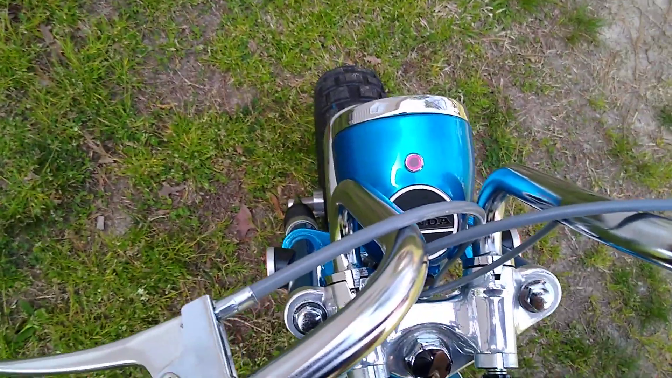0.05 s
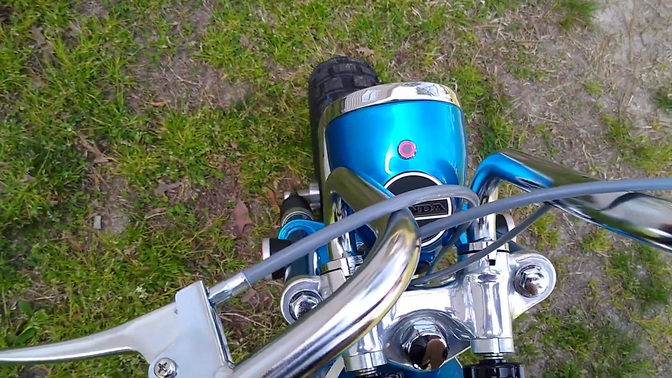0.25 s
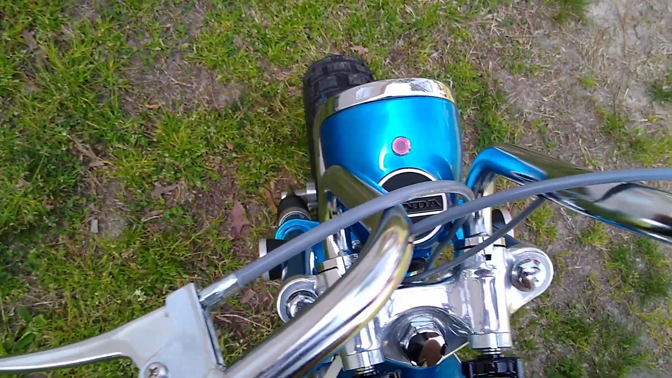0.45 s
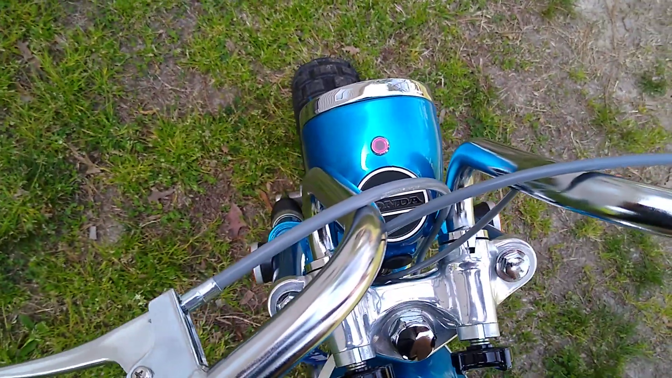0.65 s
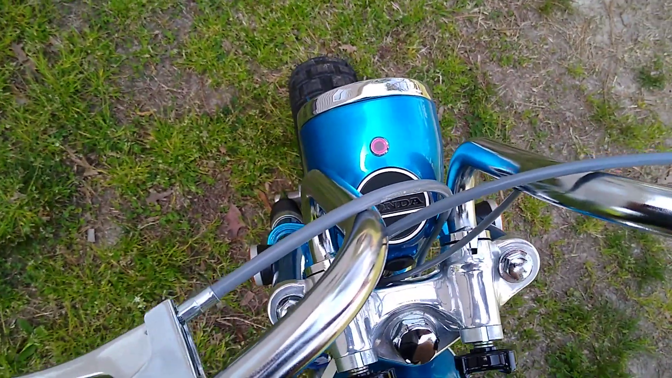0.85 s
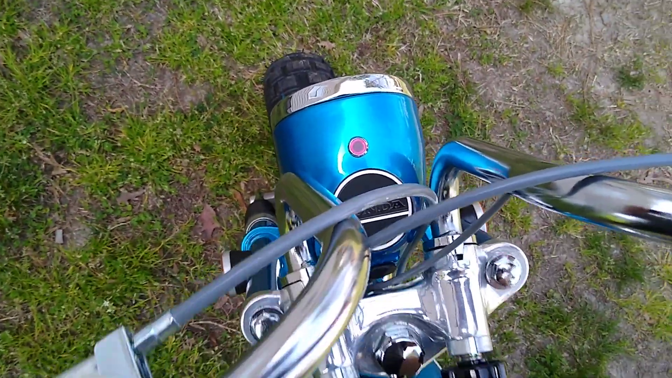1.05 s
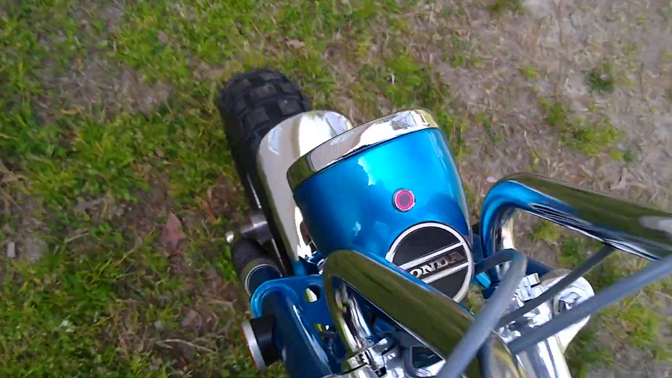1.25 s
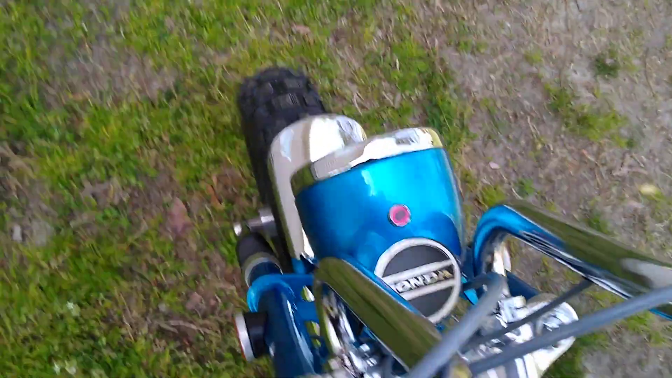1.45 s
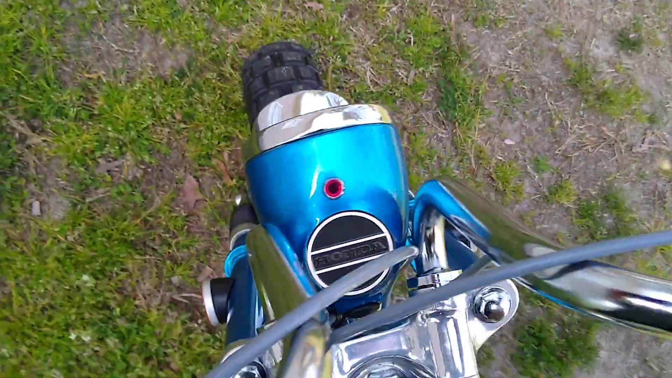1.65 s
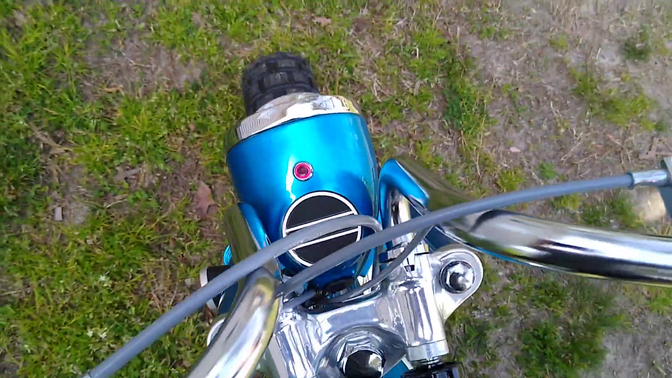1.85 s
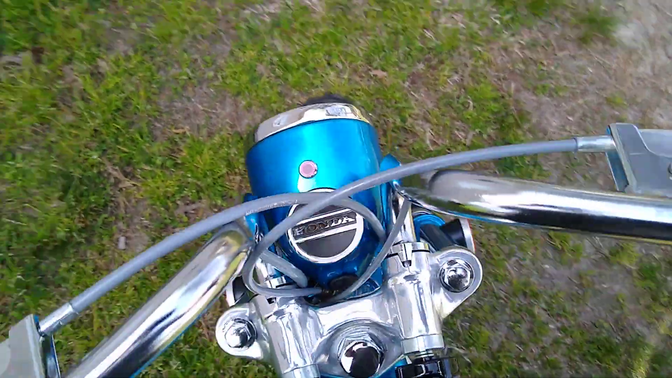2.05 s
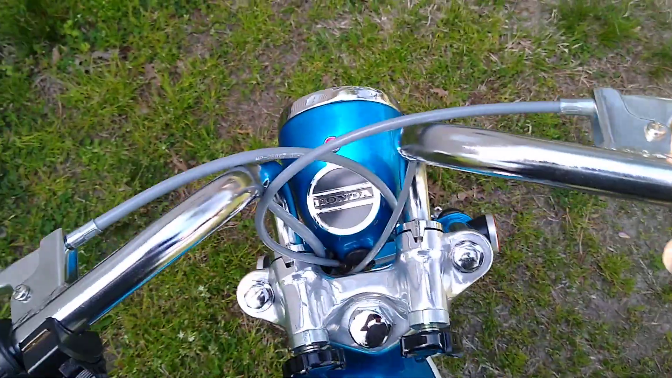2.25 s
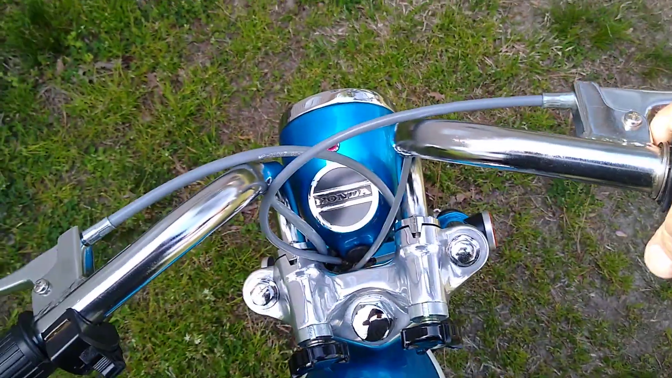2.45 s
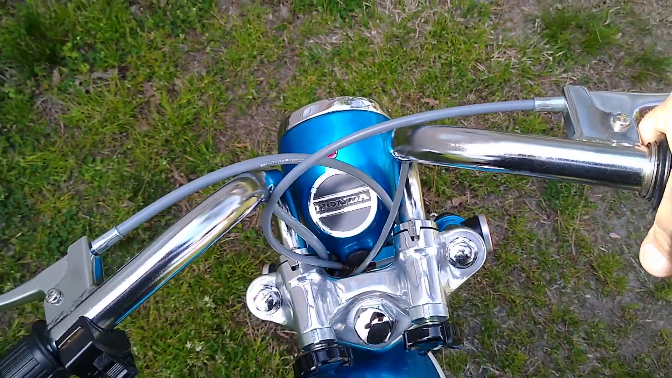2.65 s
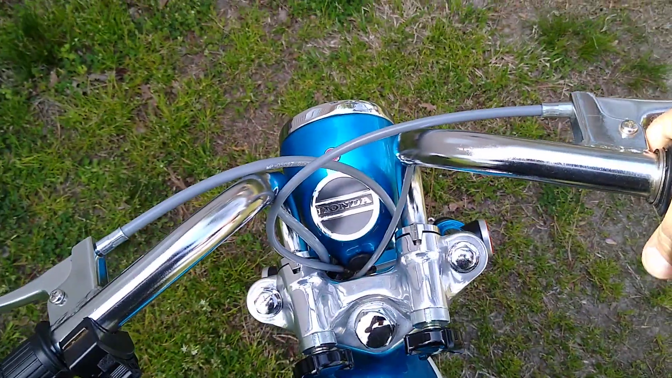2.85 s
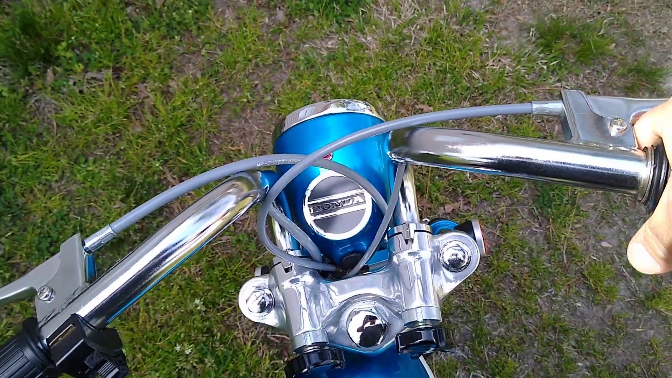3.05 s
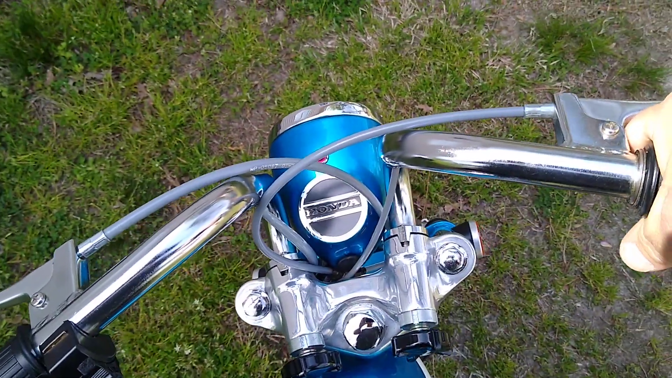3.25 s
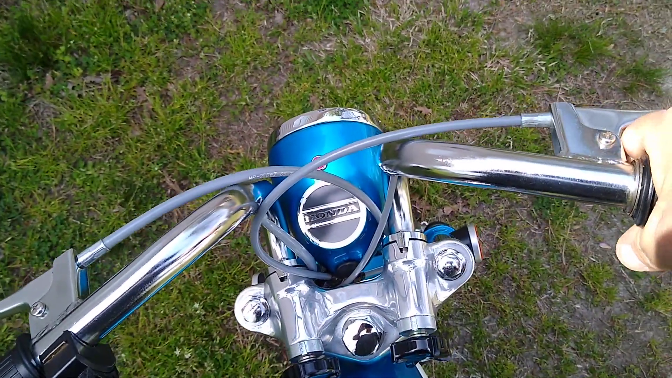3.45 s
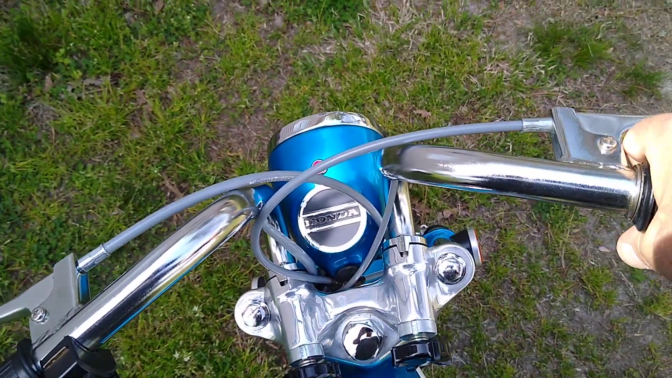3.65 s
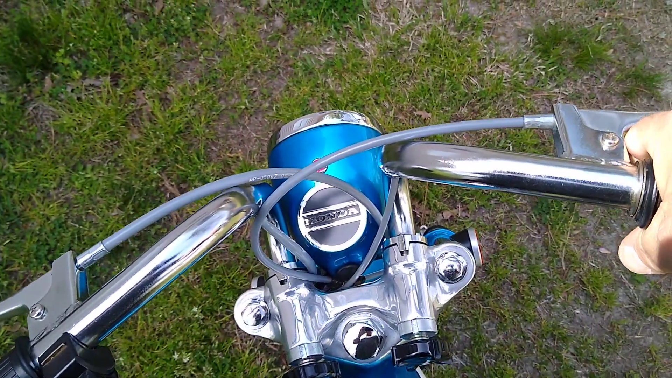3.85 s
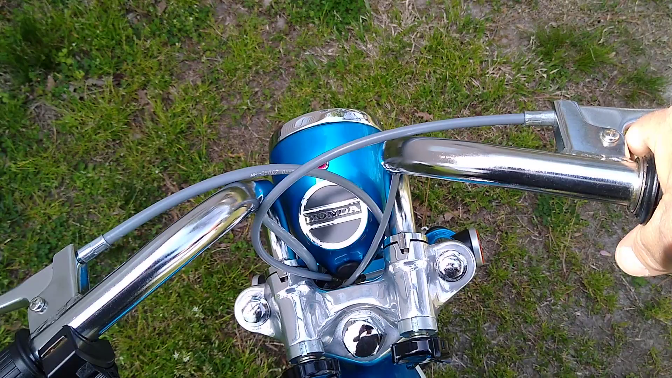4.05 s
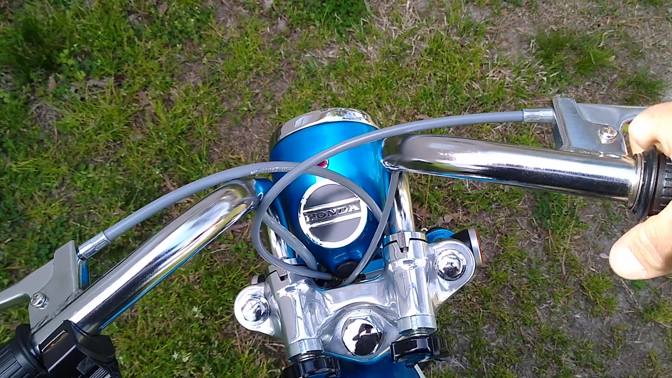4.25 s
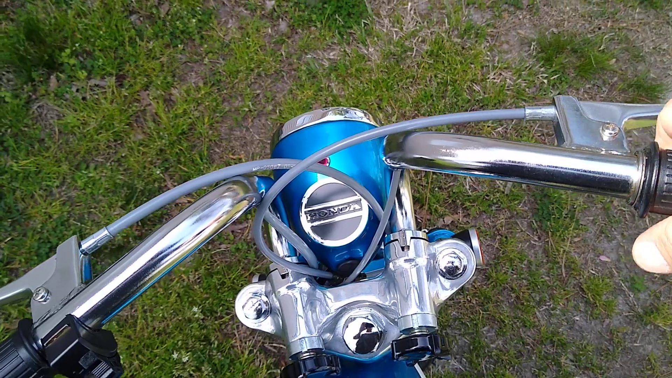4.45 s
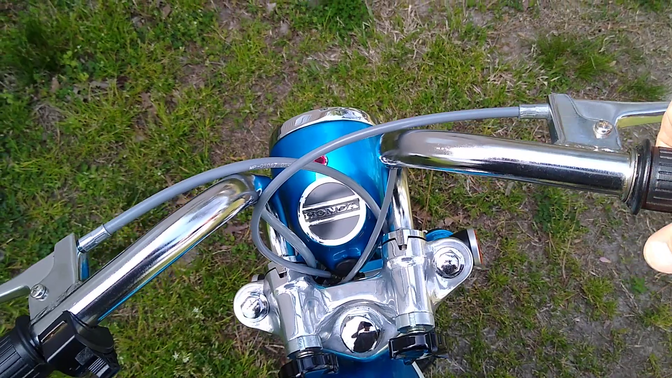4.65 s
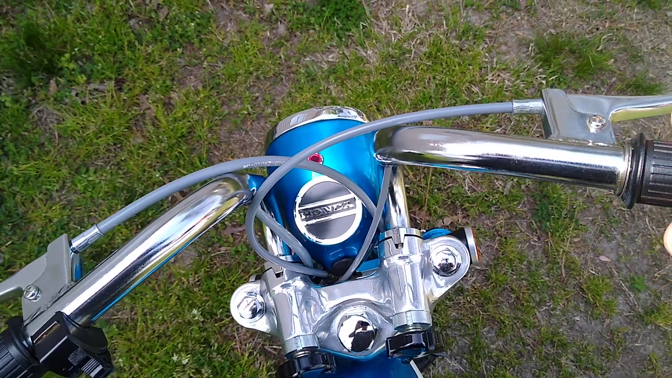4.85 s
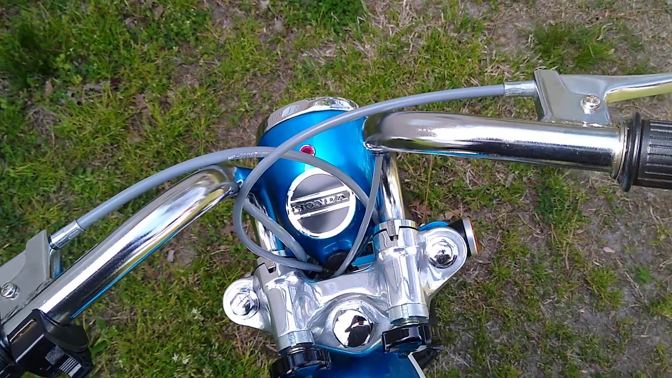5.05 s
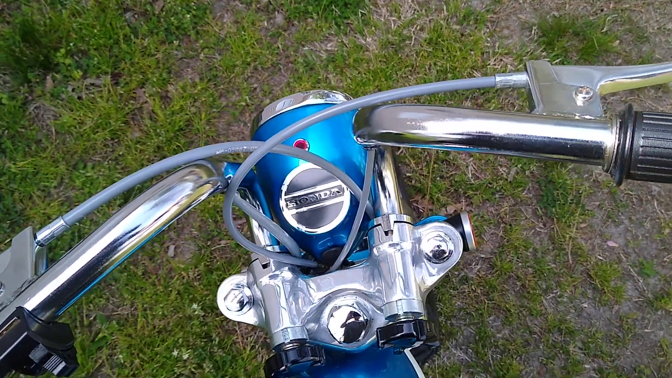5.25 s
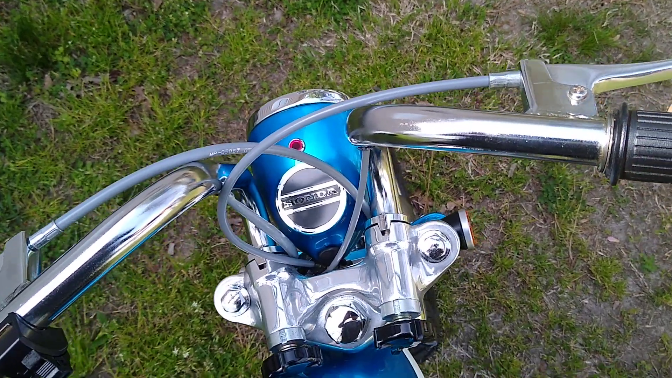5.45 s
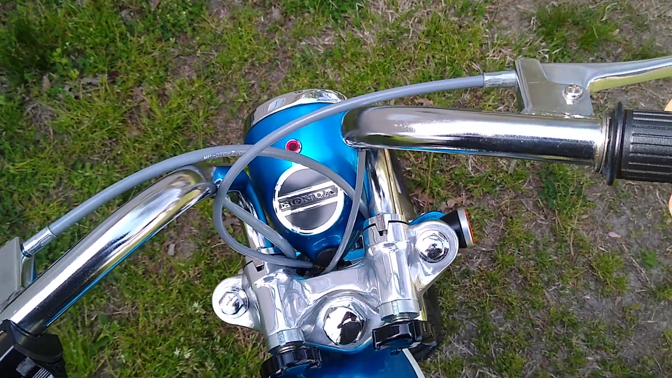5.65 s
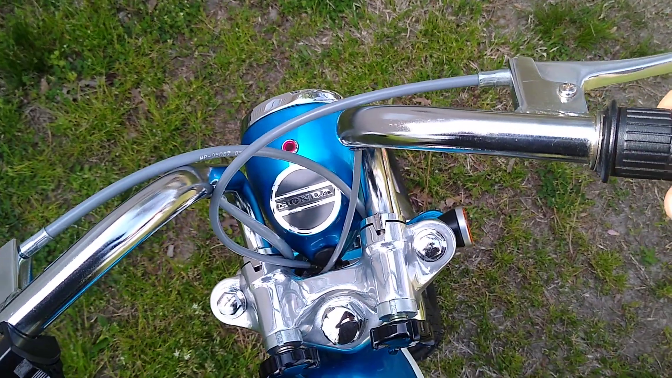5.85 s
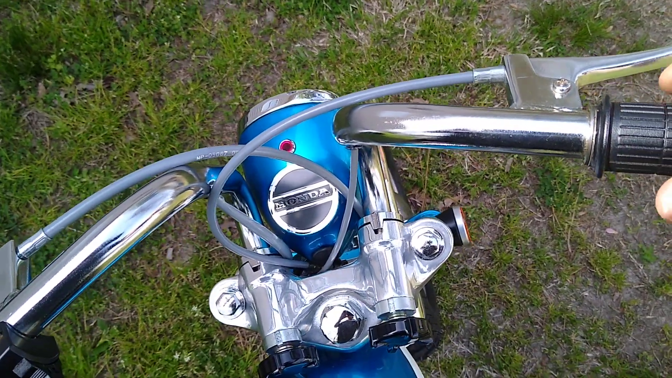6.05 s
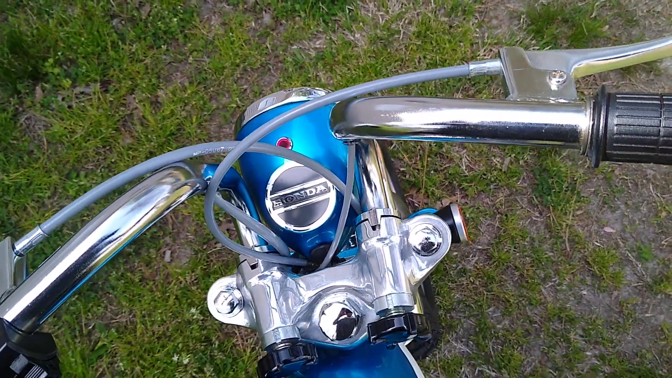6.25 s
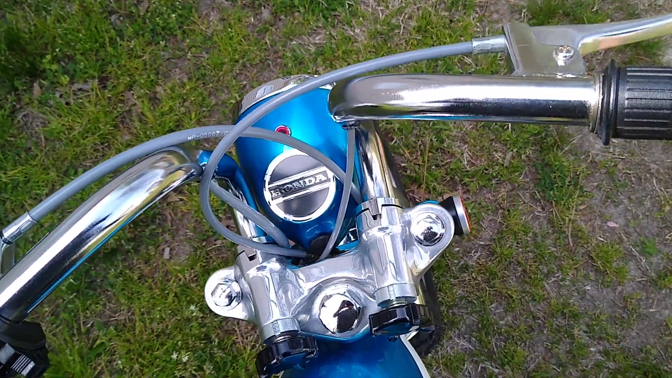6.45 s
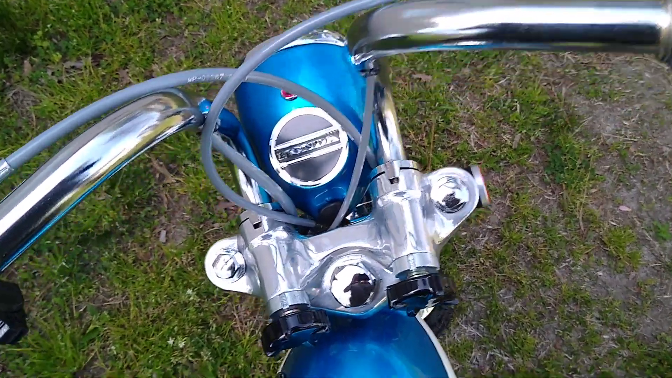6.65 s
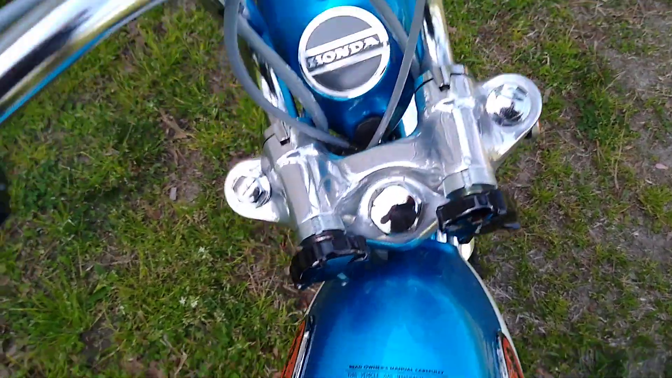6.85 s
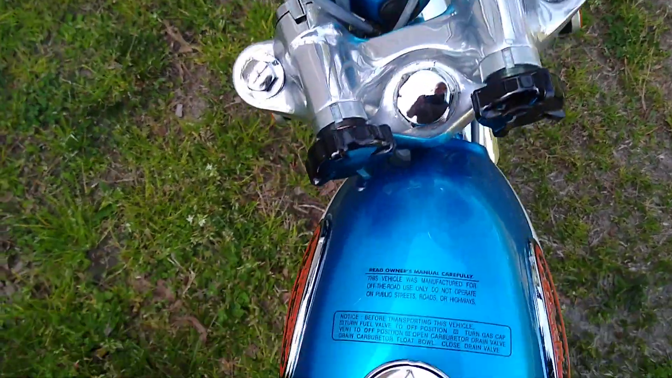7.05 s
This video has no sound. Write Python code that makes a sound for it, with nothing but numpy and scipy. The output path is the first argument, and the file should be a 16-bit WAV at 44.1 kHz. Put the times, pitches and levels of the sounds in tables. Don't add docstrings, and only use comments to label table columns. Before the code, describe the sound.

After a quiet second of breeze, faint birds and small clicks, a kick lever rattles a little four-stroke engine into life; it stumbles, sags and recovers to fast idling.

```python
import sys
import numpy as np
from scipy import signal
from scipy.fft import rfft, irfft, next_fast_len
from scipy.io import wavfile
from scipy.ndimage import uniform_filter1d

SR = 44100
rng = np.random.default_rng(int(sys.argv[2]) if len(sys.argv) > 2 else 0)


def pcm_store(signal):
    levels = np.round(np.clip(np.atleast_2d(signal), -1, 1) * 32767)
    wavfile.write(sys.argv[1], SR, levels.astype(np.int16).T)


def boost(x):
    u = np.asarray(x, float) / 20
    return 10 ** u


N = 313110

# t/s, blast lost level/dB, thump lost level/dB
MISFIRES = [(1.245, 18.5, 21), (1.328, 28, 10), (1.803, 34, 13), (1.922, 19, 6), (2.048, 27, 3),
            (2.658, 2.5, -0.5), (2.708, 30, 3), (2.808, 15, 6), (2.859, 18, 2.5), (2.968, 31, 7),
            (3.032, 14, 8), (3.102, 42, 7.5), (3.173, 13, 8), (3.333, 13, 6), (3.426, 2.5, 1.5),
            (3.525, 29, 4), (6.503, 32, 14)]
# t/s, cycle rate f/Hz
CRANK_SPEED = [(1.245, 11.907), (1.46, 12.186), (1.54, 14.418), (1.74, 17.716), (2.1, 14.849),
               (2.38, 21.695), (2.58, 22.713), (2.9, 17.487), (3.34, 11.518), (3.46, 8.589), (3.98, 13.319),
               (4.26, 15.089), (4.78, 21.587), (4.94, 24.15), (5.14, 24.644), (5.66, 24.906),
               (5.94, 23.783), (7.1, 22.664)]
# t/s, flow level/dB
AIR_FLOW = [(1.26, -32), (1.36, 4), (1.8, 7.5), (1.88, 4), (2.05, -7.5), (2.2, 8), (2.42, 4.5), (2.6, -6.5),
            (2.85, -20), (3.0, -20), (3.35, -24), (3.6, -7.5), (3.75, 2), (4.2, 2), (5.3, 0), (5.75, -3),
            (6.5, -2), (7.1, 0.5)]
# t/s, facing 0-1
FACING = [(1.4, 0.98), (2, 1), (2.3, 0.77), (3, 0), (3.9, 1), (4.6, 0.52), (7.1, 0)]

# f/Hz, width f/Hz, level/dB, polarity (signed strength)
CAN_MODES = [(62.6, 89, -5, -1.16), (118.5, 25.7, 3, 0.98), (164, 35.6, 0, -0.52), (192.9, 8.7, 6, 0.7)]
# f/Hz, width f/Hz, level/dB, polarity
PIPE_MODES = [(342, 40, -0.6, 1), (434, 34, -1.3, 1), (493, 71, -7.0, -1), (719, 51, -7.6, 1),
              (810, 175, -4.7, -1), (937, 131, -9.0, 1), (1058, 65, -24.8, -1), (1367, 69, -5.0, -1),
              (1426, 236, -4.7, 1), (1596, 735, -13.6, -1), (1861, 95, -8.8, 1), (2084, 104, -22.4, -1),
              (2762, 136, -17.2, 1)]
# f/Hz, width f/Hz, level/dB, polarity
SNORKEL_MODES = [(113, 66, -3, -0.97), (181.15, 9.3, 6, 0.71)]
# f/Hz, width f/Hz, level/dB, polarity
SHIELD_MODES = [(3392, 56, -1.5, 0.79), (4010, 38, -3.5, -0.8), (4300, 120, -3.5, 0.77),
                (5320, 54, -4.5, -0.94)]
# f/Hz, width f/Hz, level/dB, polarity
CASE_MODES = [(189, 72, 3.5, 1), (374, 105, 0, -1.6), (466, 72, 4, 1), (840, 215, -6.5, -1.23),
              (1394, 140, 2, 0.57), (1890, 203, -1, -0.73), (2980, 810, -15, 0.29), (4160, 144, -11, -0.6)]
# f/Hz, width f/Hz, level/dB, polarity
JET_MODES = [(10200, 600, 0, 1), (12900, 700, 0, -1)]

# f/Hz, level/dB (per Hz)
EXHAUST_HISS = [(2000, -5), (3000, -4), (4100, -5.5), (4800, -4.5), (6500, -8.5), (7700, -9.5), (10000, -4),
                (12800, -3.5), (15600, -4.5), (15950, -55)]
# f/Hz, level/dB
BAFFLE_RASP = [(500, -63), (900, -9), (1150, -6), (1450, 15), (1750, -33), (2050, 10), (2400, -4.5),
               (2700, 10.5), (3100, -24), (5000, -59)]
# f/Hz, level/dB
INTAKE_HISS = [(2000, -47), (4000, -2.5), (6500, -6), (9000, -8), (10500, 0.5), (12800, 10.5), (15600, 2),
               (15950, -42)]
# f/Hz, level/dB
BUFFET = [(25, -20), (50, 3.5), (90, 5), (150, 1), (300, -16.5), (600, -44.5)]
# f/Hz, level/dB
AIR_RUSTLE = [(100, 6), (300, 10), (700, 4), (1500, 2), (2300, -6), (3200, -19), (4500, -17), (5500, -40),
              (8000, -48)]
# f/Hz, level/dB
RESTING_HISS = [(3000, -2), (6000, -11), (9000, -24), (11000, 0), (13500, 2), (15700, -4), (15950, -40)]

# f/Hz, left-right level/dB
LEFT_LEAN = [(60, 2.5), (110, 3.0), (200, 2.5), (380, 2.5), (700, 4.0), (1290, 10.0), (2380, 9.5),
             (4400, 3.0), (8120, 2.5), (15000, 4.5)]
# f/Hz, likeness 0-1
PORT_LIKENESS = [(100, 0.82), (500, 0.86), (1200, 0.06), (3000, 0.052), (10000, 0.029)]
# t/s, buffet level/dB
GUSTS = [(0, -57), (.06, -60), (.17, -46.5), (.25, -55.5), (.34, -50), (.5, -56.5), (.79, -58),
         (.85, -56.5), (1.1, -57.5)]
# t/s, half length t/s, level/dB
INSECTS = [(.04, .09, -76), (0.37, .035, -71), (.83, 0.083, -77), (1.02, .08, -84)]
# t/s, level/dB, f/Hz, width f/Hz, t60 t/s
TICKS = [
    (.549, -47, 9100, 9000, 0.012),
    (.595, -62, 11000, 7000, .02),
    (.687, -59, 1870, 505, 0.067),
    (.724, -60, 4500, 4000, .03),
    (0.739, -47.5, 1800, 900, 0.036),
    (.919, -54, 1790, 700, 0.062),
    (1.176, -57, 920, 1800, 0.09),
    (1.202, -52.5, 1800, 3500, 0.095),
]
# t/s, level/dB, f/Hz, width f/Hz
RUSTLES = [(.1, -66, 4500, 1000), (0.29, -67, 4500, 1000), (0.26, -59.5, 2400, 400), (0.69, -62, 2830, 500),
           (0.51, -67, 3700, 450)]
# start t/s, length t/s, first f/Hz, last f/Hz, level/dB
BIRDS = [(0, 0.039, 4300, 3900, -75), (0.027, 0.073, 3800, 3600, -70), (.09, .05, 3800, 3650, -77),
         (0.142, 0.064, 3450, 2760, -64), (.16, 0.06, 2250, 2120, -68), (0.248, 0.072, 3170, 2390, -71),
         (0.511, 0.14, 3620, 3600, -75), (0.653, .06, 3870, 3700, -80)]

# level at full idle/dB, dB per dB of speed, dB per dB of flow (exhaust: scatter of strokes/dB)
BLAST, THUMP, SPIT = (-5, 1.17, 0.1, 0.28), (-22.5, 0.42, -0.02, 0.48), (-19.5, 0.02, 0.57, 1.5)
ROAR, HISS, GEAR = (-53.5, -1.3, 0.6), (-33.5, 0.12, 0.71), (-29.5, 1, 0.14)
WHISTLE = (-46, 6.9, 0.87)
IDLE_HZ = 24.4
UNEVEN = 1.37
LEVER_S, BITE_S = 1.17, 1.225
CATCH_S, LET_GO_S = 1.4, 1.8
TOP_HZ = 15950


def cycles():
    t = np.arange(CRANK_SPEED[0][0], N / SR + .1, 1e-4)
    turns = np.cumsum(curves(CRANK_SPEED, t)[0]) * 1e-4
    s = np.interp(np.arange(int(turns[-1])), turns, t)
    levels = [law(k, s) + k[3] * rng.standard_normal(len(s)) for k in (BLAST, THUMP, SPIT)]
    rows = np.c_[s, np.transpose(levels)]
    for at, blast_db, thump_db in MISFIRES:
        spit_db = min(33, 1.6 * blast_db)
        rows[np.argmin(abs(s - at)), 1:] -= [blast_db, thump_db, spit_db]
    return rows


def exhaust(rows):
    s, blast_db, thump_db, spit_db = rows.T
    gap = np.gradient(s)
    speed = (1 / IDLE_HZ / gap)[:, None]
    tone = pipe_blast(s, blast_db, speed) + can_thump(s, thump_db, gap, speed)
    return tone + heat_shield(s, blast_db, speed) + hot_gas(s, blast_db, spit_db)


def pipe_blast(s, blast_db, speed):
    pipe = modes(PIPE_MODES, scatter(PIPE_MODES, np.linspace(.3, 1.6, len(PIPE_MODES)), speed))
    facing = curves(FACING, s).T
    top_db = -5 + 5.5 * facing ** 2
    bounce_db = -2 + 10 * facing

    def heat(f):
        return speed ** (0.22 / (1 + (f / 800) ** 4))

    def outlet(f):
        tilt_db = top_db * f * f / (f * f + 700 ** 2)
        return boost(tilt_db + bounce_db * bell(f, 1034, 116) - 4.2 * bell(f, 575, 89))

    def baffle(f):
        return (1 + .6 * np.exp(-2j * np.pi * f * .0019)) / (1 + 1j * f / 5400)

    return rings(s - .0001, blast_db + 37, lambda f: pipe(f / heat(f)) * baffle(f) * outlet(f))


def can_thump(s, thump_db, gap, speed):
    can = modes(CAN_MODES, scatter(CAN_MODES, .3, speed))
    snorkel = modes(SNORKEL_MODES, scatter(SNORKEL_MODES, .4, speed))

    def stroke(f):
        return (1j * f / (1j * f + 75 * speed ** 1.45)) ** 2

    def muffled(f):
        return boost(-6 * bell(f, 307, 54)) / (1 + 1j * f / 500) ** 2

    thump = rings(s - .003, thump_db + 57,
                  lambda f: can(f / speed ** 0.051) * stroke(f) * muffled(f), top_hz=3000)
    gulp = rings(s + 0.399 * gap, thump_db + 50.5,
                 lambda f: snorkel(f / speed ** 0.036) * stroke(f), top_hz=4000)
    return thump + gulp


def heat_shield(s, blast_db, speed):
    shield = modes(SHIELD_MODES, scatter(SHIELD_MODES, 2.5, speed))
    return rings(s + 0.001002, blast_db + 13, shield, top_hz=9000)


def hot_gas(s, blast_db, spit_db):
    rasp = signal.fftconvolve(pulses(s, blast_db - 22), puff(0.12))[:N]
    spit = signal.fftconvolve(pulses(s, spit_db + 2.5), puff(0.019) + 0.15 * puff(0.22))[:N]
    fizz_db = spit_db - 3 + 6 * rng.standard_normal(len(s))
    fizz = signal.fftconvolve(pulses(s + .0005, fizz_db), puff(0.024))[:N]
    noise = shaped(fizz * pair(), colour(INTAKE_HISS))
    noise = noise + shaped(rasp * pair(), colour(BAFFLE_RASP))
    return noise + shaped(spit * pair(), colour(EXHAUST_HISS))


def puff(t60):
    t = np.arange(SR // 8) / SR
    return boost(-60 * t / t60) * (1 - np.exp(-t / 0.0016))


def intake(rows):
    t, s = np.arange(N) / SR, rows[:, 0]
    turn = np.interp(t, s, np.arange(len(s)))
    phase = turn % 1
    moving = t > LEVER_S
    roar_db, hiss_db, gear_db = breath(t)
    vary = boost(2 * rng.standard_normal(len(s)))[turn.astype(int)]
    gasp = vary * np.exp(-((phase - .47) / 0.13) ** 4)
    clack, tick = valves(s)
    chatter = gears(t, phase, gear_db)

    rattle = (boost(roar_db) * gasp + chatter) * moving * patchy(pair())
    case = modes(CASE_MODES)
    body = shaped(rattle + clack, lambda f: case(f) * 1j * f / (1j * f + 350) * (f < TOP_HZ))
    rush = shaped((boost(hiss_db) * gasp + tick) * moving * pair(), colour(INTAKE_HISS))
    whirr_off = boost(-2 * 0.5 * (t < CATCH_S))
    gear_hiss = boost(-11.5) * chatter * vary * whirr_off * moving
    return jet_whistle(t, gasp) + body + rush + shaped(gear_hiss * pair(), colour(EXHAUST_HISS))


def valves(s):
    gap = np.diff(s)
    loose = (gap * IDLE_HZ) ** UNEVEN
    draw = lambda: rng.standard_normal(len(gap))
    shut = s[:-1] + (0.54 + 0.00572 * loose * draw()) * gap
    opens = s[:-1] + (0.29 + 0.0066 * loose * draw()) * gap
    harder_db = 6.5 * (shut > CATCH_S) * (shut < LET_GO_S)
    clack = pulses(shut, breath(shut)[0] + 26 + harder_db + 3 * draw())
    clack = clack + pulses(opens, breath(opens)[2] + 22 + 4 * draw())
    tick = pulses(opens, breath(opens)[2] - 8 + 3 * draw())
    decay = boost(-60 * np.arange(2000) / SR / 0.0084)
    return clack, signal.fftconvolve(tick, decay)[:N]


def gears(t, phase, gear_db):
    level_db = gear_db + 0.5 * (t < CATCH_S) - 5 * phase * (t > CATCH_S)
    grains = boost(3 * rng.standard_normal(N // 80 + 1)).repeat(80)[:N]
    return boost(level_db) * grains


def jet_whistle(t, gasp):
    air = boost(law(WHISTLE, t)) * (0.27 + gasp) * (t > BITE_S)
    hole = modes(JET_MODES)
    return shaped(air * pair(), lambda f: hole(f) ** 2)


def breath(t):
    slack_db = 16.5 * np.exp(-np.maximum(t - BITE_S, 0) / .012)
    rattle_db = 5.5 * (1 - np.tanh((t - LET_GO_S) / .02)) / 2 * (t > CATCH_S)
    return np.array([law(ROAR, t) + rattle_db, law(HISS, t), law(GEAR, t)]) - slack_db


def outdoors():
    return wind() + handling() + birds()


def wind():
    t = np.arange(N) / SR
    gust_db, = curves(GUSTS, t)
    air = boost(gust_db + [[-2], [2]]) * shaped(pair(), colour(BUFFET))
    rustle_db = -63.5 + 0.59 * (gust_db + 55.5)
    air = air + boost(rustle_db) * shaped(pair(), colour(AIR_RUSTLE))
    swell = boost(-79.5) + sum(boost(db) * np.exp(-((t - s) / half) ** 2) for s, half, db in INSECTS)
    return air + swell * shaped(pair(), colour(RESTING_HISS))


def handling():
    out, u, noise = np.zeros((2, N)), np.arange(SR // 2) / SR, pair()
    events = [(*k, .001) for k in TICKS] + [(*k, 0.77, .04) for k in RUSTLES]
    for s, db, hz, width, t60, rise in events:
        at = slice(round(s * SR), round(s * SR) + len(u))
        band = signal.iirpeak(hz, hz / width, SR)
        envelope = boost(db - 60 * u / t60) * (1 - np.exp(-u / rise))
        burst = envelope * np.roll(noise, round(hz), axis=1)[:, at]
        burst = signal.lfilter(*band, signal.lfilter(*band, burst))
        out[:, at] += burst * np.sqrt(SR / 2 / width)
    return out


def birds():
    out = np.zeros(N)
    for s, length, first_hz, last_hz, db in BIRDS:
        u = np.linspace(0, 1, round(length * SR))
        warble = 800 * uniform_filter1d(rng.standard_normal(len(u)), size=150)
        pitch = first_hz + (last_hz - first_hz) * u + warble
        note = np.sin(2 * np.pi * np.cumsum(pitch) / SR)
        out[round(s * SR):][:len(u)] += boost(db) * np.sin(np.pi * u) * note
    return out


def law(layer, t):
    db, per_speed, per_flow = layer[:3]
    speed_db = 20 * np.log10(curves(CRANK_SPEED, t)[0] / IDLE_HZ)
    return db + per_speed * speed_db + per_flow * curves(AIR_FLOW, t)[0]


def scatter(table, db, speed):
    spread_db = db / np.maximum(speed, .55) ** UNEVEN
    return boost((spread_db * rng.standard_normal((len(speed), len(table)))).T[:, :, None])


def modes(table, spread=1):
    spread = np.broadcast_to(spread, (len(table),) + np.shape(spread)[1:])

    def response(f):
        return sum(k * sign * boost(db) * 1j * f * w / (c * c - f * f + 1j * f * w)
                   for k, (c, w, db, sign) in zip(spread, table))
    return response


def rings(s, db, response, top_hz=17000):
    size = 6144
    hz = np.fft.rfftfreq(size, 1 / SR)
    wave = irfft(response(hz[hz < top_hz]), size) * boost(db)[:, None]
    at = np.round(s * SR).astype(int)[:, None] + np.arange(size)
    return np.bincount(at.ravel(), wave.ravel(), N + SR)[:N]


def pulses(s, db):
    return np.bincount(np.round(s * SR).astype(int), boost(db), N + SR)[:N]


def bell(f, hz, width):
    return np.exp(-((f - hz) / width) ** 2)


def along(points, hz):
    f, v = np.transpose(points)
    return np.interp(np.log(hz + 1), np.log(f + 1), v)


def curves(rows, t):
    s, *cols = np.transpose(rows)
    return np.array([np.interp(t, s, c) for c in cols])


def filtered(x, response):
    m = next_fast_len(N + SR // 2)
    return irfft(rfft(x, m) * response(np.fft.rfftfreq(m, 1 / SR)), m)[..., :N]


def shaped(source, response):
    power = np.mean(abs(response(np.linspace(0, SR / 2, 8192))) ** 2)
    return filtered(source, response) / np.sqrt(power)


def colour(points):
    return lambda f: boost(along(points, f)) * (f < TOP_HZ)


def pair():
    m = next_fast_len(N)
    likeness = along(PORT_LIKENESS, np.fft.rfftfreq(m, 1 / SR))
    turn = np.arccos(np.clip(likeness, -1, 1)) / 2
    a, b, c, d = rng.standard_normal((4, len(turn))) * np.sqrt(m / 2)
    mid = (a + 1j * b) * np.cos(turn)
    side = (c + 1j * d) * np.sin(turn)
    return irfft([mid + side, mid - side], m)[:, :N]


def patchy(x):
    z = signal.stft(x, nperseg=512)[2]
    field = uniform_filter1d(rng.standard_normal(z.shape[1:]), size=5, axis=0)
    field = uniform_filter1d(field, size=4, axis=1)
    gain = boost(2.5 * field / field.std() - 1)
    return signal.istft(z * gain, nperseg=512)[1][:, :N]


def scene():
    rows = cycles()

    def ports(f):
        half_db = along(LEFT_LEAN, f) / 2
        return np.array([boost(half_db), boost(-half_db) * np.exp(2j * np.pi * f * .00005)])

    return filtered(exhaust(rows) + intake(rows), ports) + outdoors()


def band_limit(x):
    return signal.sosfilt(signal.butter(12, 16970, fs=SR, output="sos"), x)


def record(dry):
    mix = filtered(dry, lambda f: (1j * f / (1j * f + 40)) ** 2 * (f < TOP_HZ))
    return band_limit(mix)


dry = scene()
out = record(dry)
pcm_store(out)
```